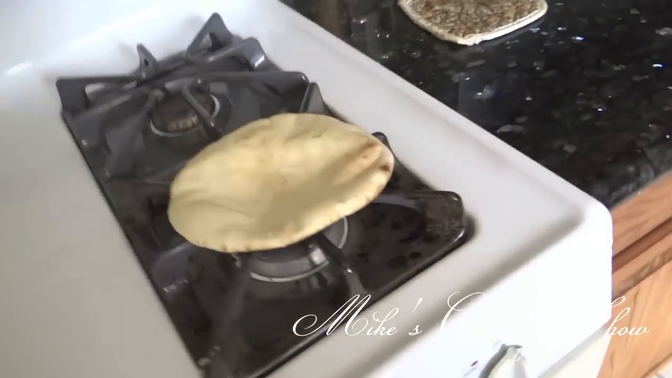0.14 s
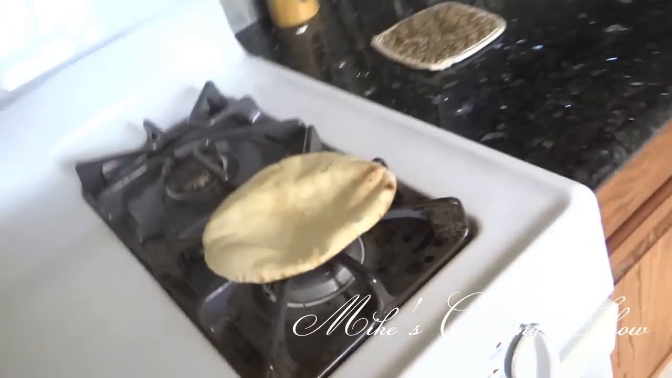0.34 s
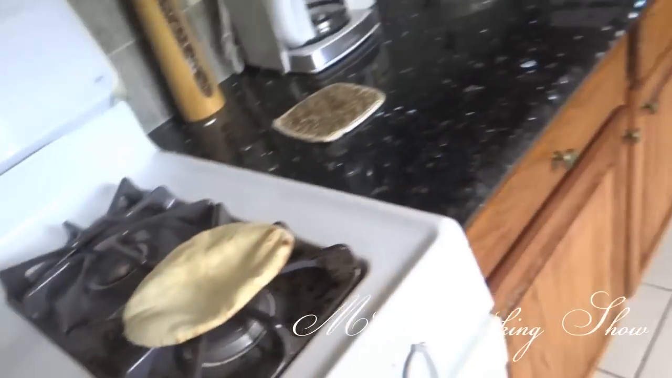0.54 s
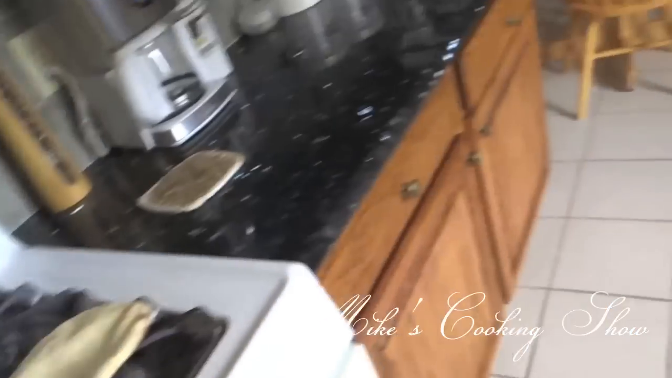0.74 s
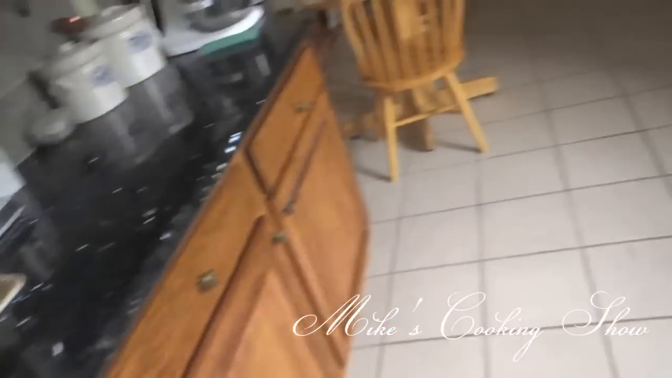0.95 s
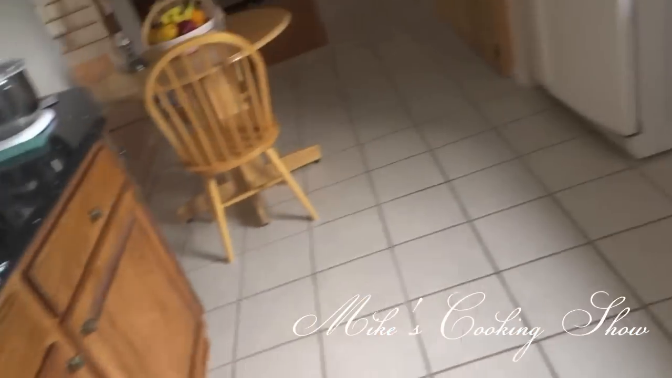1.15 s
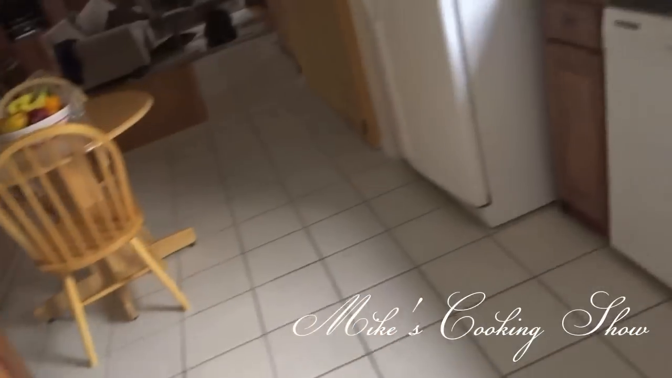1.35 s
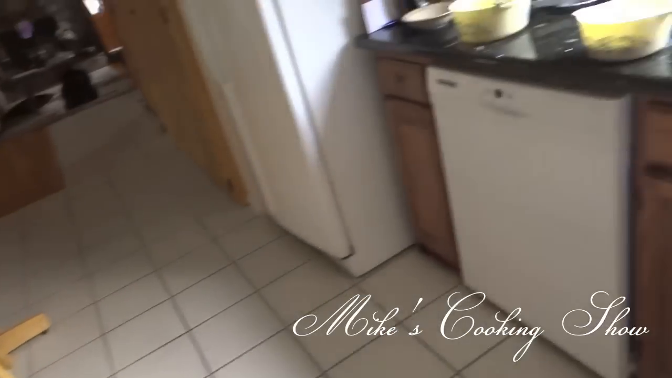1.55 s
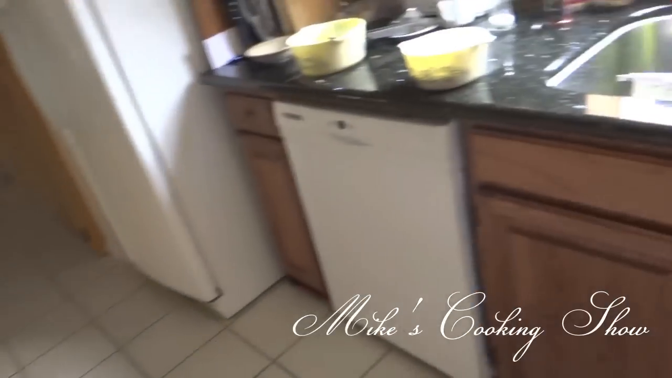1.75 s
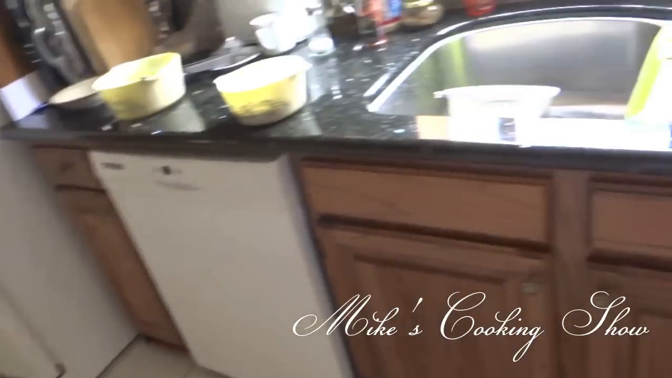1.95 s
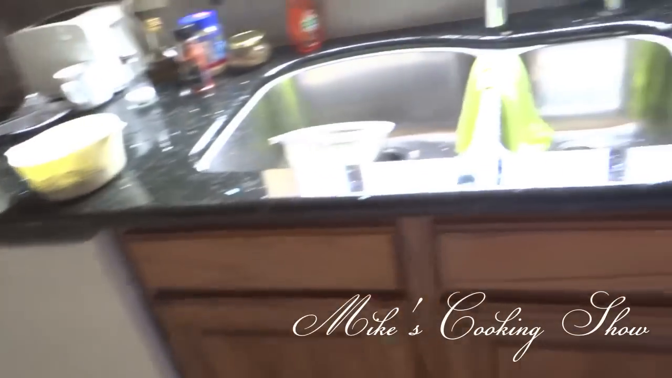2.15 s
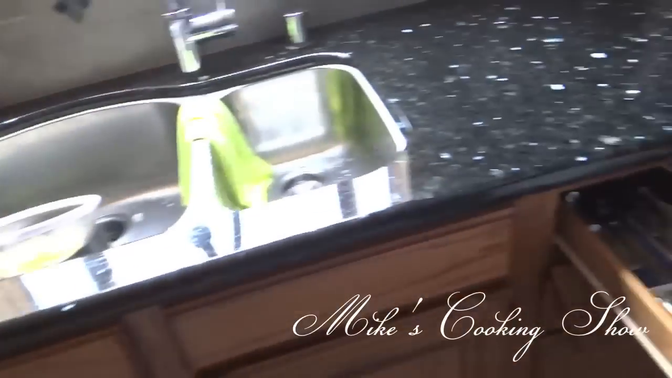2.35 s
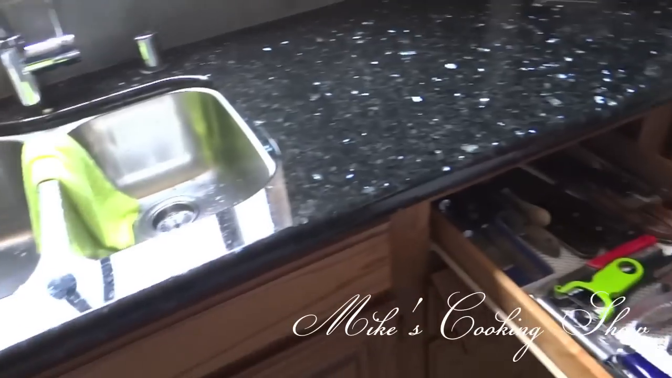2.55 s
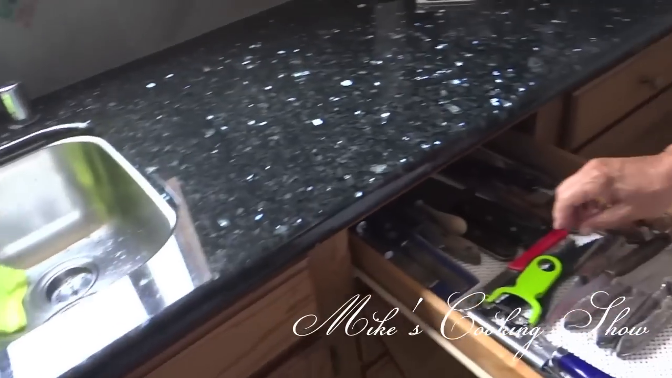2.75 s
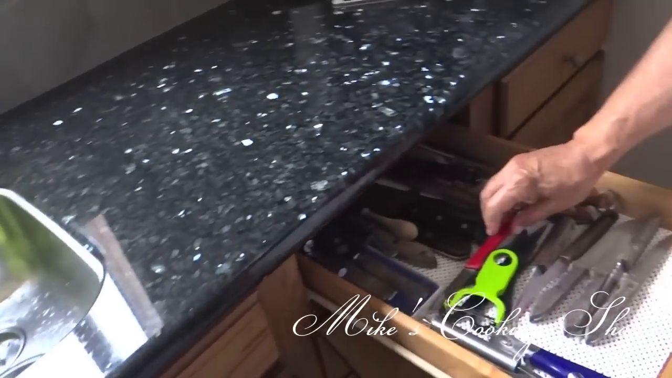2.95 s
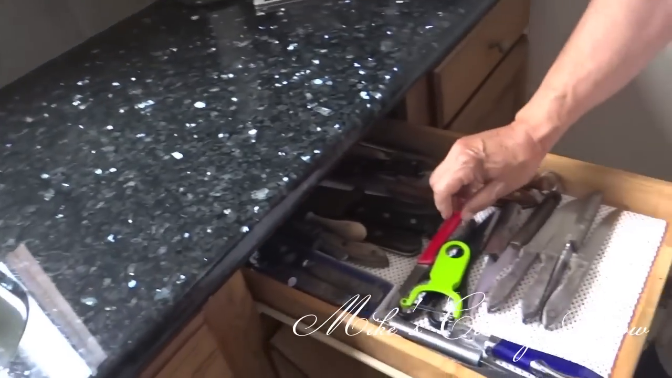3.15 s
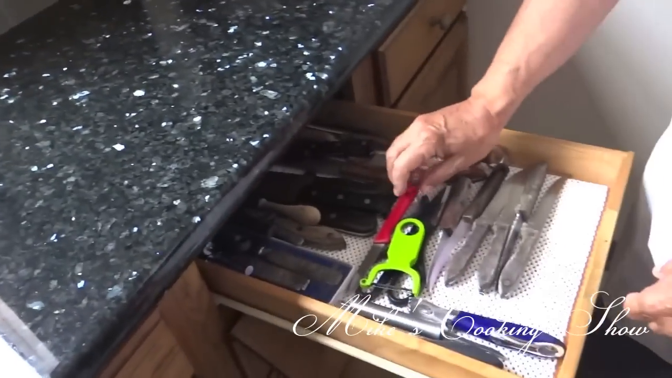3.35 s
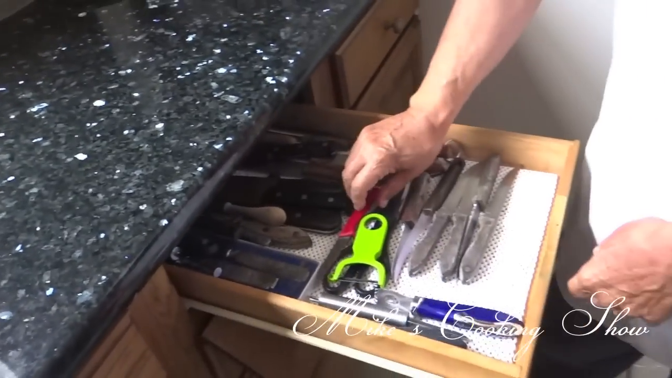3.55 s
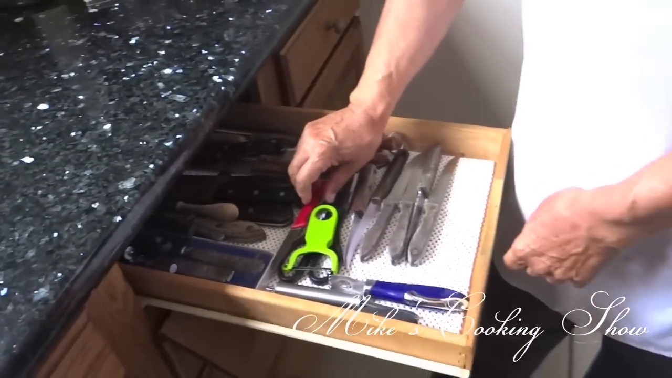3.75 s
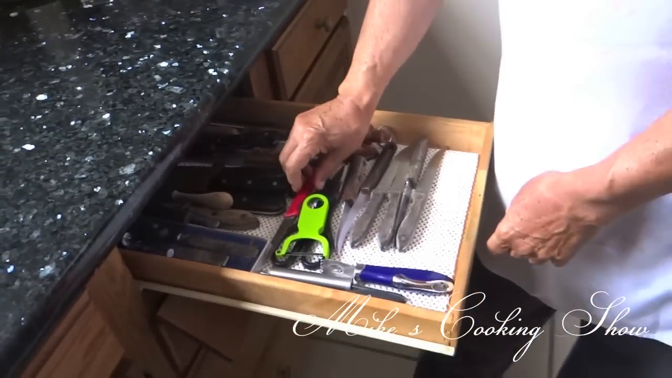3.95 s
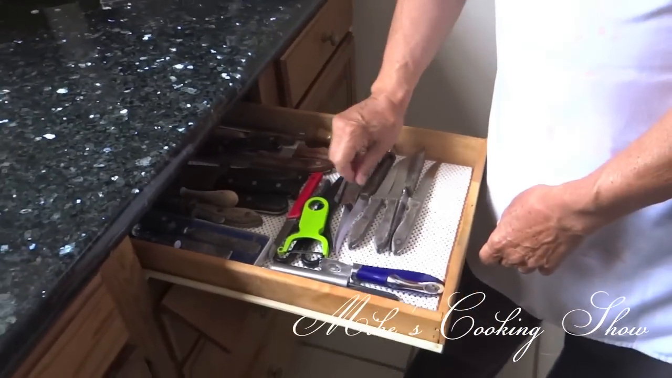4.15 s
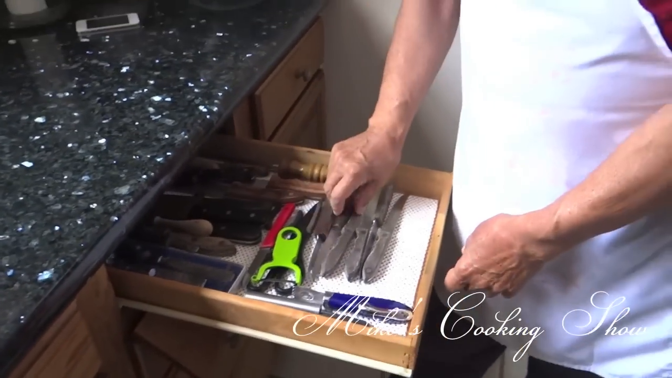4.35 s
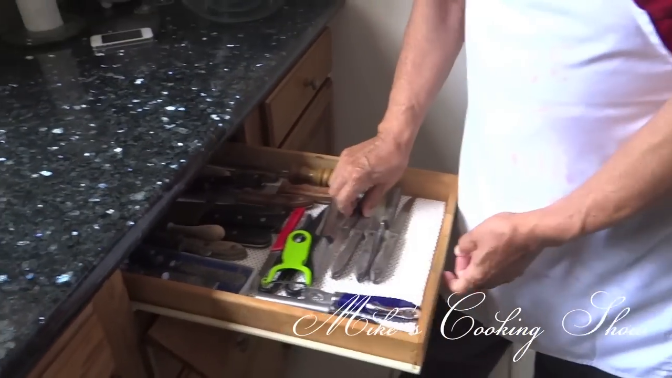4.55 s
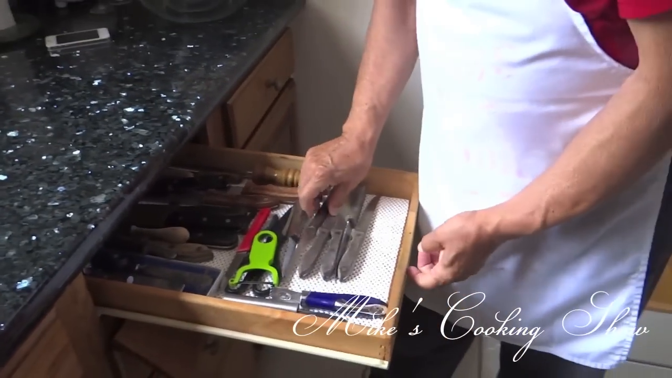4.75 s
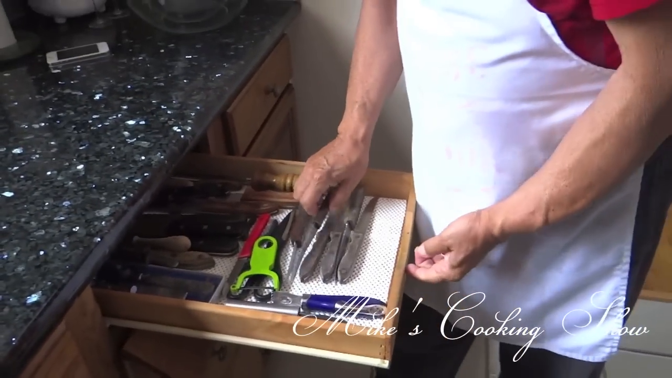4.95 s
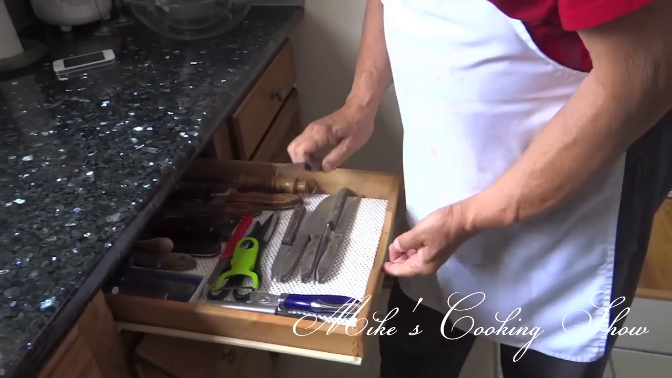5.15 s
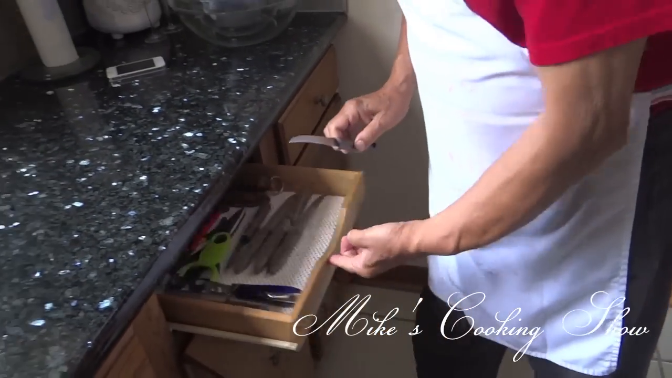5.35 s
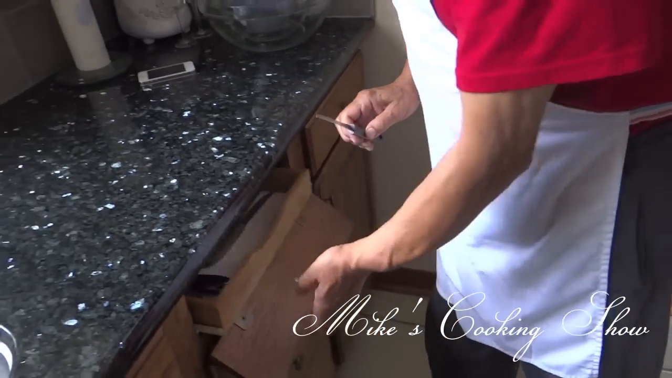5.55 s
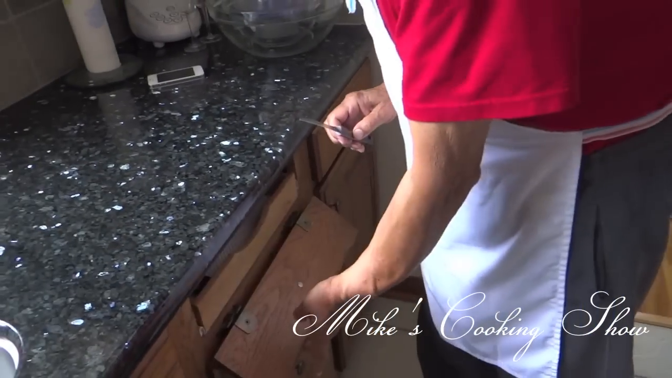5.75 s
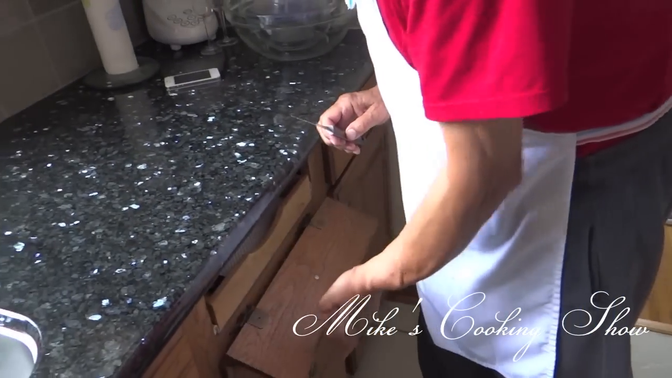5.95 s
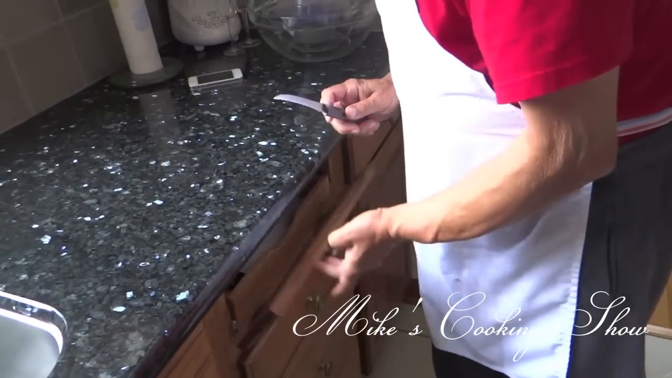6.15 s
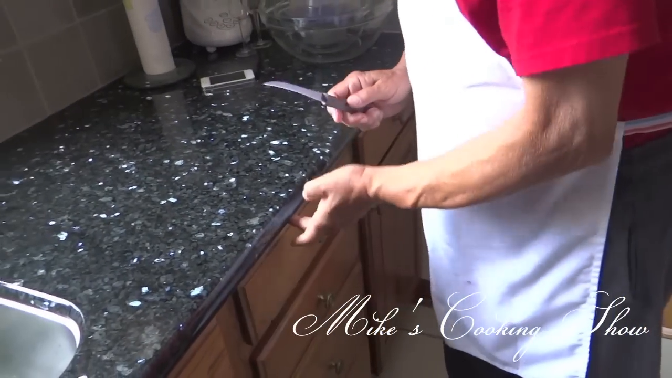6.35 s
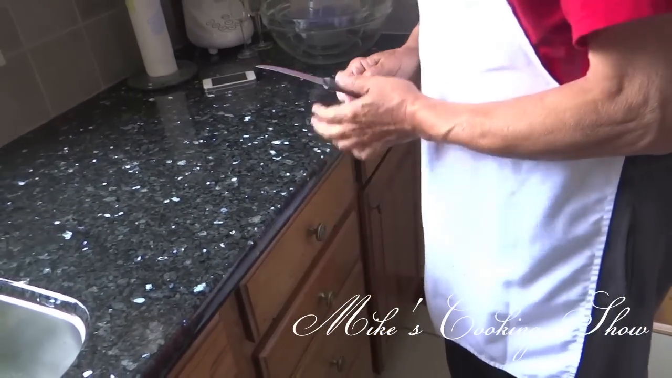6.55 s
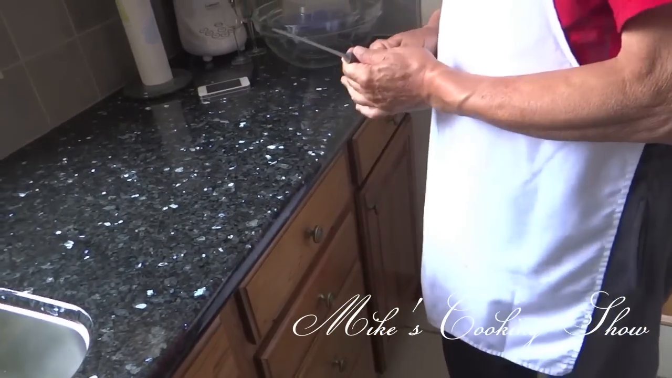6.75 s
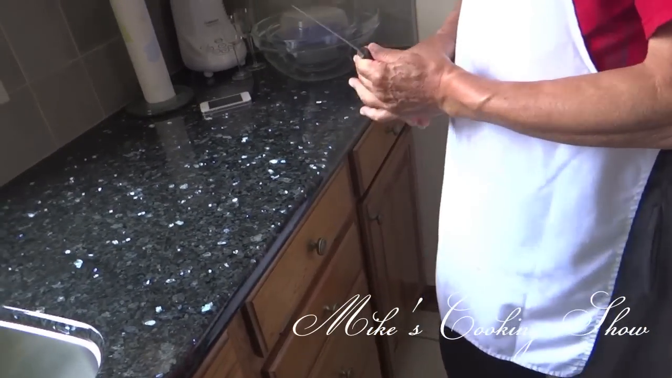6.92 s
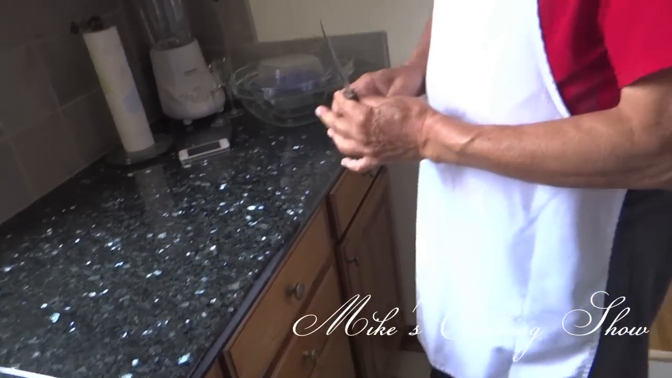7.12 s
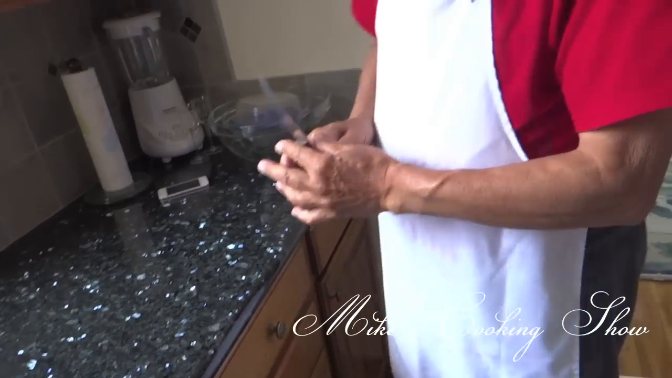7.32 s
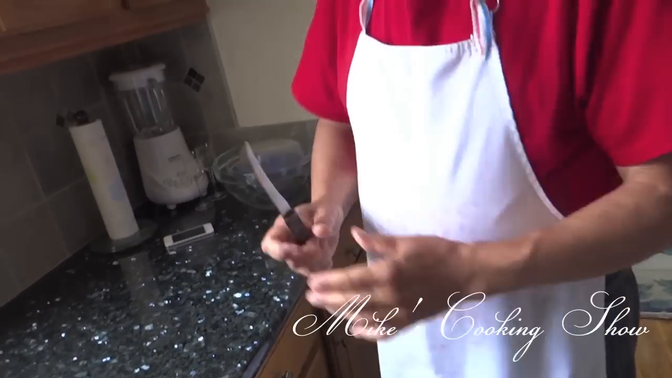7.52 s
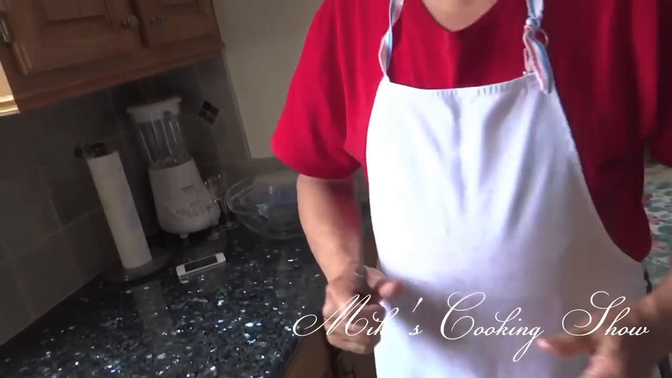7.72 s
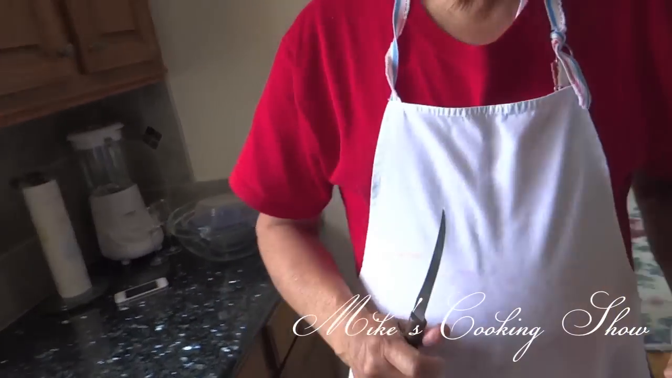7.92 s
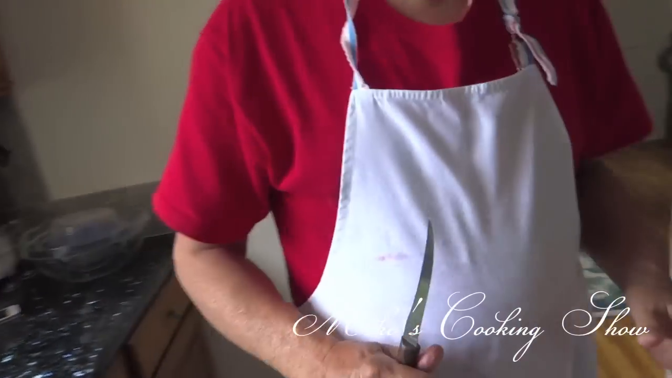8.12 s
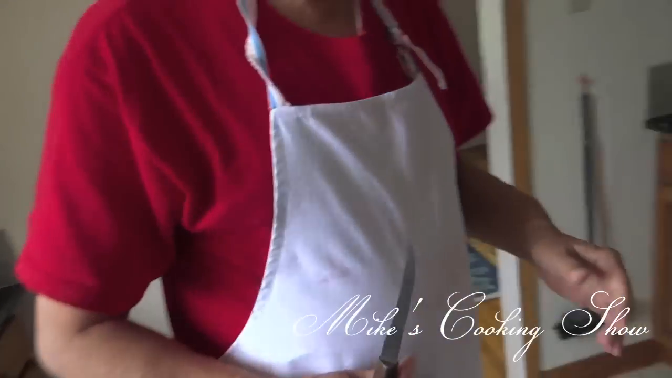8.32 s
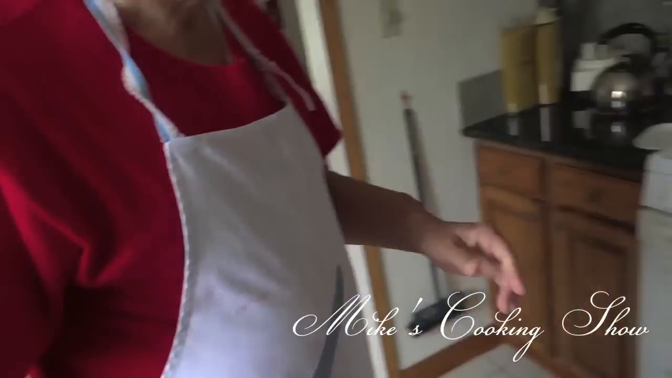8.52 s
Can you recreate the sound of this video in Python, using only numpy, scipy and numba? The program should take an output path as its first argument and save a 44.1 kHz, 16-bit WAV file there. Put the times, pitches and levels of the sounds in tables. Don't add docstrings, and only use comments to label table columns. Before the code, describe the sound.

A small, hard-walled kitchen with a faint fridge hum and airy room tone, heard through a hand-held microphone. From 0 to 1.3 s soles scuff softly on tile, strongest near 0.9 and 1.3, with a tiny chirp. At 1.4 a cabinet front knocks loudly and echoes. From 1.8 to 2.3 a wooden drawer rumbles open on rollers, cutlery skidding to a hard stop at 2.2. A quieter search follows: plasticky clicks at 3.65, a bright blade clatter bouncing at 4.0 to 4.1, dry blade ticks at 4.5, thin steel scrapes around 4.8. From 5.1 the drawer rolls back, with a sharp metallic crash at 5.3, and slams at 5.65. Loose cutlery jingles and rattles until 6.1; a shorter, brighter wooden bang lands at 6.3. Dry handle clicks come near 7.0, then faint cloth rustling, and a final scuff and metallic tick at 8.55.

```python
import sys
import numpy as np
from scipy import signal
from scipy.fft import rfft, irfft, next_fast_len
from scipy.io import wavfile
from scipy.ndimage import uniform_filter1d, minimum_filter1d
from numba import njit

SR = 44100
rng = np.random.default_rng(int(sys.argv[2]) if len(sys.argv) > 2 else 0)


def linear_from_db(decibels):
    return 10 ** (np.asarray(decibels, float) / 20)


def store_pcm(level_fs):
    pcm = np.round(np.clip(level_fs, -1, 1) * 32767).astype(np.int16)
    wavfile.write(sys.argv[1], SR, np.atleast_2d(pcm).T)


N = 378378
TIME = np.arange(N) / SR

# start in seconds, strength in dB, chatter decay in seconds,
# build-up in seconds, share of panel ring in dB.
BLOWS = [
    (1.392, -8, 0.043, 0.0021, -6),
    (5.651, -9.5, 0.031, 0.0034, -11.5),
    (6.2944, -14.5, 0.045, 0.00039, -5),
]
# time the panel keeps shaking in seconds,
# crack into the room in dB, panel into the room in dB.
BLOW_PLACE = [
    (0.0085, 0.64, 2),
    (0.051, 0.23, -7.5),
    (0.016, 0.64, -1),
]
# frequency in Hz, level in dB, t60 in seconds.
THUD = [(287, 2.5, 0.0099), (398, -8, 0.0043), (590, -9, 0.0053), (920, 2, 0.0034)]


def level(x, db):
    return x * linear_from_db(db) / np.sqrt(np.mean(x ** 2))


def shaped(x, points):
    hz, db = np.transpose(points)
    n = next_fast_len(len(x), real=True)
    f = np.maximum(np.arange(n // 2 + 1) * SR / n, 1)
    gain = linear_from_db(np.interp(np.log(f), np.log(hz), db))
    return irfft(rfft(x, n) * gain, n)[:len(x)]


def band(x, lo_hz, hi_hz):
    return signal.sosfilt(signal.butter(2, [lo_hz, hi_hz], "bandpass", fs=SR, output="sos"), x)


def add(track, s, x):
    i = int(s * SR)
    track[i:i + len(x)] += x[:len(track) - i]


def gate(db):
    return uniform_filter1d(linear_from_db(db), size=600)


def swell(s, db, rise, fall):
    out = np.zeros(N)
    i = slice(max(int((s - 3 * rise) * SR), 0), int((s + 3 * fall) * SR))
    away = np.where(TIME[i] < s, (s - TIME[i]) / rise, (TIME[i] - s) / fall)
    out[i] = linear_from_db(db - 20 * away ** 1.37)
    return out


def grains(rate, scatter_db):
    size_db = scatter_db * np.minimum(rng.exponential(size=N), 4)
    return (rng.random(N) < rate / SR) * rng.standard_normal(N) * linear_from_db(size_db)


def ring(modes, length):
    t = np.arange(int(max(length, .2) * SR))[:, None] / SR
    hz, db, t60 = np.transpose(modes)
    start = 2 * np.pi * rng.random(len(hz))
    fade = linear_from_db(db - 60 * t / np.clip(t60, .005, 1))
    return (fade * np.sin(2 * np.pi * hz * t + start)).sum(axis=1)


def burst(points, decay, rise=0.00013, hold=0):
    t = np.arange(8192) / SR
    noise = level(shaped(rng.standard_normal(8192), points), -10.0)
    return noise * np.exp(-np.maximum(t - hold, 0) / decay) * np.minimum(t / rise, 1)


def tick(db, hz, thud_db, treble_db, t60, ring_db=-10, click_s=0.013):
    low_db = -2.0 - .5 * treble_db
    colour = [(600, low_db - 11.0), (1600, low_db), (3000, 0.5 * treble_db),
              (6000, treble_db), (11000, treble_db - 6.5)]
    click = burst(colour, click_s, rise=0.00056)
    hump = [(.6 * hz, -40), (.88 * hz, -10), (hz, 0), (1.12 * hz, -10), (1.6 * hz, -40)]
    body = burst(hump, t60 / np.log(1000), rise=0.0013)
    metal = ring([(hz, ring_db, t60)], .2)[:8192]
    thud = linear_from_db(thud_db + 4.5) * ring(THUD, .2)[:8192]
    return linear_from_db(db) * (0.95 * click + 0.82 * body + metal + thud)


def blows():
    # frequency in Hz, density in dB per Hz.
    colours = [
        [(35, -76), (60, -52), (150, -22), (391, -7.5), (436, -17), (620, -3), (1020, 0.5), (1610, -8.5),
         (7430, -11), (11000, -27.5), (14300, -85), (22000, -120)],
        [(24, -73), (40, -24), (256, -16.5), (350, -8.5), (483, -14), (560, -10), (700, -17.5), (1390, -20),
         (8300, -25.5), (11000, -31), (14300, -81), (22000, -120)],
        [(24, -70), (40, -75), (198, -20), (275, 3), (506, 7.5), (1150, -0.5), (1390, 5.5), (1800, -2.5),
         (4500, -5), (11000, -15), (14300, -65), (22000, -120)],
    ]
    out = np.zeros(N)
    for (s, db, chatter, rise, _), colour in zip(BLOWS, colours):
        add(out, s, linear_from_db(db) * burst(colour, chatter, rise))
    return out


def panels():
    # frequency in Hz, level in dB, t60 in seconds.
    panel_modes = [
        [(806, -9, 0.022), (1016, 6, 0.09), (960, 8, 0.028), (1440, -11, 0.036), (2430, -7, 0.045),
         (3160, 1, 0.018), (4900, -26, 0.052), (6470, 11.5, 0.011), (7280, 5, 0.02)],
        [(260, 10.5, 0.042), (356, -4, 0.072), (479, 1, 0.028), (715, 14.5, 0.034), (1030, 16.5, 0.0099),
         (810, 1, 0.08), (1400, 11.5, 0.025), (2240, 17, 0.0069), (3220, 11, 0.0087), (6040, 17, 0.0043),
         (8400, 9.5, 0.017)],
        [(204, 2, 0.093), (506, 0, 0.046), (806, 10, 0.02), (1485, 14.5, 0.012), (2250, 0.5, 0.046),
         (2400, 2, 0.084), (2950, 5.5, 0.015), (3920, 7, 0.04), (4540, 0, .06)],
    ]
    out = np.zeros(N)
    for (s, db, chatter, rise, ring_db), modes, (hold, *_) in zip(BLOWS, panel_modes, BLOW_PLACE):
        push = burst([(50, 0), (11000, 0)], chatter, 2 * rise, hold)
        damped = [(hz, g, min(t60, .009 + 55 / hz)) for hz, g, t60 in modes]
        panel = signal.fftconvolve(push, ring(damped, .2))[:8192]
        add(out, s, linear_from_db(db + ring_db) * panel * push.std() / panel.std())
    return out


def carcass():
    # start in seconds, frequency in Hz, level in dB, held in seconds, fade in seconds.
    tones = [
        (5.657, 479, -14, .055, .018),
        (5.657, 356, -21, .05, .02),
        (5.655, 705, -22, .03, .02),
        (1.393, 1012, -17, .02, .025),
        (1.445, 1005, -18, .025, .05),
    ]
    out = np.zeros(N)
    t = np.arange(int(.3 * SR)) / SR
    for s, hz, db, hold, fade in tones:
        shape = np.minimum(t / .006, 1) * np.exp(-np.maximum(t - hold, 0) / fade)
        add(out, s, ring([(hz, db, 1)], .3) * shape)
    return out


def drawer():
    # time in seconds, level in dB.
    rolls = [
        [(1.72, -46), (1.78, -45.5), (1.826, -33), (1.95, -33), (2.06, -30), (2.11, -32.5), (2.168, -32.5),
         (2.204, -34), (2.32, -43)],
        [(5.0, -60.5), (5.118, -44), (5.2, -36), (5.276, -29), (5.315, -36), (5.334, -25.5), (5.42, -26.5),
         (5.45, -32), (5.64, -36.5)],
    ]
    # frequency in Hz, width in Hz, level in dB.
    resonances = [(350, 34, 12), (652, 42, 12), (813, 23, -1.5), (1420, 210, 13), (2064, 320, 13)]
    # frequency in Hz, density in dB per Hz.
    grit_colour = [(710, -74), (1200, 2), (1300, 7.5), (2150, 10.5), (3700, 5), (4500, -0.5), (8500, -3),
                   (11000, -18), (14300, -61), (22000, -120)]
    # peak in seconds, level in dB, rise and fall in seconds.
    slides = [
        (2.078, -26, .004, .08),
        (2.106, -21.5, 0.0073, 0.18),
        (2.188, -11, 0.0052, 0.04),
        (2.258, -21, 0.012, 0.037),
        (5.135, -34.5, 0.019, 0.58),
        (5.324, -6, 0.014, 0.02),
        (5.62, -42, 0.067, 0.08),
    ]
    # peak in seconds, level in dB, rise and fall in seconds.
    nudge = (3.565, -47, .006, .1)
    curves = [np.interp(TIME, *np.transpose(rows), left=-120, right=-120) for rows in rolls]
    db = np.max(curves, axis=0)
    skid = sum(swell(*row) for row in slides)
    shake = grains(1500, 2.2)
    box = sum(linear_from_db(g) * band(shake, hz - w / 2, hz + w / 2) / np.sqrt(w) for hz, w, g in resonances)
    box = level(box, -8.5) + level(band(shake, 200, 950), -4)
    grit = level(shaped(grains(5000, 0.25), grit_colour), -1.1)
    slide = level(band(grains(4000, 2.5), 3300, 8300), -14)
    creep_db, skid_grit_db = -38, -18.5
    grit_db = db - 9 + 0.028 * (db + 32)
    out = box * gate(db) + slide * (skid + gate(db + creep_db))
    out += grit * (gate(grit_db) + linear_from_db(skid_grit_db) * skid)
    push = band(rng.standard_normal(N), 307 - 60, 307 + 70)
    out += level(push, 0) * swell(*nudge)
    pan_db = -3 * np.exp(-((TIME - 2.22) / 0.49) ** 4)
    return out * linear_from_db(np.array([pan_db, -pan_db]) / 2)


def utensils():
    # start in seconds, peak in dB, ring in Hz, treble in dB.
    wood = [(0.7527, -27, 1440, -15), (2.192, -15, 2000, -27), (2.21, -11.5, 810, 2),
            (2.2614, -10, 1013, 26), (3.955, -46, 1610, 1), (5.207, -37, 1960, -18),
            (5.2275, -13.5, 1860, -8), (5.87, -23.5, 1420, -23), (5.92, -26, 1590, -26),
            (5.993, -21.5, 1520, -11), (5.997, -31, 2200, -23), (6.045, -29, 1670, -28),
            (6.897, -31.5, 535, -13), (8.3795, -41, 1300, -20)]
    handles = [(0.176, -65, 3180, -27), (2.0775, -18.5, 2960, -16), (2.1019, -20.5, 2890, 6),
               (2.1845, -18.5, 3920, -5), (2.186, -24, 2140, -10), (2.2, -14.5, 1510, -3),
               (2.2522, -25, 2800, -15), (3.525, -38.5, 5900, 9)]
    peeler = [(3.6524, -21, 2450, 11), (3.6604, -22, 8000, -4), (3.6715, -17, 2620, -7),
              (3.68, -24, 2370, -7), (3.6932, -26, 2680, -3), (3.7033, -31, 2560, -8)]
    steel = [(4.723, -42, 4960, -1), (4.782, -32, 6000, 1), (5.142, -19, 4600, 18), (5.282, -19, 7300, -11),
             (5.2975, -16, 7500, -6), (5.309, -12, 8400, 3), (5.323, -4.5, 9100, -2),
             (5.338, -8.5, 6150, -7), (5.134, -17, 5600, 14), (5.208, -18.5, 5960, -7),
             (5.228, -22, 6940, -13), (5.3105, -7, 4270, 2), (5.31, -8, 2260, 6), (5.3205, -6.5, 6060, -16),
             (8.5629, -18.5, 4450, 6)]
    kinds = ((wood, -16, 0.033, .009), (handles, -9.5, 0.1, .009),
             (peeler, -18, .028, .005), (steel, -20.5, 0.015, .009))
    out = np.zeros(N)
    for rows, thud_db, t60, click_s in kinds:
        for s, db, hz, treble_db in rows:
            add(out, s, tick(db, hz, thud_db, treble_db, t60, click_s=click_s))
    return out


def fingers():
    # start in
    # seconds, peak in dB, ring in Hz, treble in dB, ring t60 in seconds.
    near = [(6.977, -28, 3350, -29, 0.024), (6.2428, -36, 1230, -3, 0.022),
            (6.2892, -12.5, 2900, -4, 0.011), (6.2895, -12, 910, -22, 0.0097),
            (6.978, -20.5, 2590, -9.5, 0.034), (6.9988, -33, 3300, 3, 0.02), (6.9985, -38, 2570, -15, .025),
            (7.0743, -38, 1500, -25, .03), (6.969, -41, 2500, -15, 0.032), (6.978, -39, 1450, -18, 0.033),
            (7, -43, 1400, -12, .025), (7.022, -39, 2900, 0, 0.019)]
    latch = (6.2718, -36, 1800, -8, .03)
    # frequency in Hz, level in dB, t60 in seconds.
    blade = [(2390, -17, .14), (2560, -15, .12), (2960, -9, .06), (3740, -5, .075), (4753, -7, .055),
             (5173, -4, .05), (5916, -3, .045), (6428, -3, .05), (6804, -2, .05), (7402, -7, .07),
             (7919, -3, .08), (8570, -7, .06), (9120, 1, .08), (9500, -4, .05), (10300, -3, .03)]
    # start in seconds, peak in dB, wood thud in dB, favoured partial in Hz.
    hits = [
        (4.0045, -16.5, -20, 4753),
        (4.0868, -27.5, -22, 3730),
        (4.135, -40, -28, 3730),
        (4.0125, -22, -26, 2480),
    ]
    out = np.zeros(N)
    for s, db, hz, treble_db, t60 in near + [latch]:
        add(out, s, tick(db, hz, -34, treble_db, t60, ring_db=-5, click_s=.0035))
    clatter_colour = [(700, -5.5), (1500, -6.5), (2500, 2.0), (5300, 0.0), (9000, 2.5), (11000, -17)]
    for s, db, thud_db, favoured_hz in hits:
        pairs = []
        for hz, g, t60 in blade:
            favour_db = 8 * (abs(hz / favoured_hz - 1) < .05)
            for k, last in ((1, 2.1), (1.012, 1)):
                pairs.append((hz * k, g + favour_db + 1.5 * rng.standard_normal(), last * t60))
        clatter = burst(clatter_colour, 0.041, rise=0.0011)
        thud = linear_from_db(db + thud_db - 7.0) * ring(THUD, .2)[:8192]
        add(out, s, linear_from_db(db - 6.5) * clatter + thud)
        add(out, s, linear_from_db(db - 15.5) * ring(pairs, .4))
    return out


def blades():
    # start in seconds, peak in dB.
    rocks = [(4.5126, -27), (4.5204, -30), (4.5351, -28), (4.5424, -32), (4.5564, -32), (4.5604, -33),
             (4.5654, -34), (4.5764, -36), (4.6234, -32), (4.6304, -38)]
    # frequency in Hz, level in dB, t60 in seconds.
    stack = [(2250, -17, .08), (2950, -18, .04), (4900, -5, .015), (5500, -7, .015), (6900, -4, .015),
             (7700, 0, .018), (10100, -1, .018)]
    # peak in seconds, level in dB, rise and fall in seconds,
    # frequency in Hz.
    scrapes = [(4.295, -51, 0.018, 0.02, 7200), (4.3, -53.5, 0.027, 0.035, 5380),
               (4.305, -57, 0.037, 0.039, 3250), (4.33, -55.5, 0.05, 0.036, 3950),
               (4.345, -57, .015, 0.014, 2250), (4.485, -57, .02, 0.025, 7140),
               (4.788, -51, .01, 0.019, 3860), (4.815, -51.5, 0.016, 0.025, 5100),
               (4.82, -55, .02, 0.026, 7300), (4.825, -56, 0.019, 0.034, 10250),
               (4.83, -47, .01, 0.028, 3450), (4.885, -56, 0.011, 0.011, 3430),
               (4.82, -57, 0.047, 0.018, 1140), (3.978, -52, .004, .008, 7600),
               (6.22, -57, 0.031, 0.057, 8460), (6.274, -50, .003, .03, 2980),
               (6.28, -48, 0.011, .02, 4150), (6.282, -49, 0.014, .02, 1870),
               (6.204, -55, .005, 0.0081, 1530), (6.904, -51, .008, .05, 1710),
               (6.915, -50, .015, 0.064, 1060), (6.91, -69, 0.01, .03, 4300),
               (7.076, -54, .003, 0.026, 1150), (7.078, -55, .004, 0.017, 1600),
               (7.095, -61, .005, 0.014, 1500), (7.13, -59, .015, 0.026, 1730),
               (7.17, -64, .015, .02, 3920), (7.27, -58, 0.017, 0.024, 1900), (7.32, -60, 0.044, .04, 3300),
               (7.36, -69, .1, 0.066, 3950), (7.4, -64, .06, .04, 3230), (7.48, -64, 0.064, 0.041, 2430),
               (7.56, -64, .03, .02, 4160), (5.33, -24, .012, 0.061, 6070),
               (5.315, -25, 0.0071, 0.031, 4430), (5.229, -43, 0.0033, 0.045, 1850),
               (3.676, -42, .008, 0.084, 2580), (5.88, -40, 0.022, 0.033, 1460),
               (5.93, -51, .02, 0.037, 1650), (6.0, -43, .012, .04, 1460),
               (6.899, -45.5, 0.0014, 0.022, 550)]
    out = np.zeros(N)
    for s, db in rocks:
        modes = [(hz * (1 + .02 * rng.standard_normal()), g + 3 * rng.standard_normal(), t60)
                 for hz, g, t60 in stack]
        click = burst([(1500, -28), (4000, -7), (7500, -2), (11000, -6)], 0.0063, rise=.0002)
        add(out, s, linear_from_db(db) * (click + linear_from_db(-10) * ring(modes, .2)[:8192]))
    rub = grains(4000, 1.8)
    half_hz = 210
    for s, db, rise, fall, hz in scrapes:
        i = slice(int((s - .3) * SR), int((s + .3) * SR))
        out[i] += level(band(rub[i], hz - half_hz, hz + half_hz), 0) * swell(s, db, rise, fall)[i]
    return out


def jingle():
    # time in seconds, level in dB.
    rattle_curve = [(5.678, -12), (5.75, -60), (5.85, -45), (5.95, -32.5), (6.029, -32.5), (6.1, -74)]
    # frequency in Hz, level in dB, t60 in seconds.
    cutlery = [(1400, 10, 0.022), (1650, 12, 0.022), (2240, 5, 0.03), (4060, -9, 0.04), (4624, -12, 0.04),
               (5320, -8, 0.03)]
    # start in seconds, frequency in Hz, level in dB, t60 in seconds.
    late_rings = [(5.735, 4059, -20, .4), (5.81, 4059, -26, .16), (5.755, 4624, -27, .2),
                  (5.82, 4624, -31, .2), (5.895, 4624, -36, .3), (5.99, 4624, -36, .1),
                  (5.868, 4910, -30, .28), (5.988, 4910, -35, .09), (5.875, 5701, -36, .22),
                  (5.875, 5437, -41, .2), (5.86, 2250, -35, .3), (5.875, 4059, -35, .2),
                  (5.76, 6433, -34, .2), (5.87, 6804, -39, .12)]
    s, db = np.transpose(rattle_curve)
    touches = grains(900, 1.4)
    rings = signal.fftconvolve(touches, ring(cutlery, .3))[:N]
    rattle = level(rings, 0) + level(band(touches, 860, 6600), -5)
    out = rattle * linear_from_db(np.interp(TIME, s, db, left=-120, right=-120))
    soft_ends = signal.windows.tukey(int(.3 * SR), .06)
    for s, hz, db, t60 in late_rings:
        pair = [(hz, db, t60), (1.006 * hz, db - 11, t60)]
        add(out, s, ring(pair, .3) * soft_ends)
    return out


def scuffs():
    # peak in seconds, level in dB, rise and fall in seconds, treble in dB.
    steps = [(0.0, -52, .05, 0.025, 18), (0.05, -44.5, 0.15, 0.26, -0.5), (0.61, -41.5, 0.08, 0.15, -0.5),
             (0.76, -56.5, 0.0055, 0.055, -25.5), (0.91, -31.5, 0.086, 0.14, -2.5),
             (1.234, -45.5, 0.0045, 0.11, 7.5), (1.29, -32, 0.051, 0.058, 3), (2.5, -50.5, 0.83, 0.15, -4),
             (2.74, -39, 0.073, 0.086, 3.5), (8.51, -39, 0.094, 0.011, 13.5), (8.58, -45, 0.011, .1, 18)]
    rustles = [(3.05, -53, .2, 0.13, -4), (3.11, -53.5, 0.018, 0.059, 1), (3.53, -51.5, 0.2, 0.22, -1),
               (3.99, -54, 0.068, 0.054, 4), (4.32, -52.5, 0.16, 0.12, 3.5), (4.52, -54.5, 0.12, 0.4, 3),
               (4.83, -51, 0.062, 0.035, 4), (6.235, -48.5, 0.062, 0.19, -1), (6.905, -54, .008, 0.14, -13),
               (6.98, -49.5, 0.02, 0.022, -26), (7.2, -55.5, 0.23, 0.83, -2),
               (7.57, -51, 0.19, 0.027, -2.5), (7.78, -56.5, 0.053, 0.22, 5), (7.95, -53, 0.2, 0.18, 0),
               (8.25, -52, 0.25, 0.05, 6), (8.37, -51.5, 0.048, 0.99, -18)]
    # level in dB, frequency in Hz, half length in seconds.
    squeak = (-43, 815, 0.035)
    mid, hiss, low = np.zeros((3, N))
    for strokes, rub_db in ((steps, -1), (rustles, -8.5)):
        for s, db, rise, fall, treble_db in strokes:
            stroke = swell(s, db, rise, fall)
            mid += stroke
            hiss += linear_from_db(treble_db) * stroke
            low += linear_from_db(rub_db - 0.82 * treble_db) * stroke
    rub = grains(9000, 0.28)
    out = level(band(rub, 1990, 5650), 0.18) * mid
    out += level(band(rub, 4340, 9160), -0.94) * hiss
    out += level(band(rub, 430, 3380), -3.15) * low
    squeak_db, hz, half = squeak
    wobble = level(band(rng.standard_normal(N), 10, 60), 1)
    chirp = level(np.sin(2 * np.pi * hz * TIME + wobble), squeak_db)
    return out + chirp * np.exp(-((TIME - .945) / half) ** 2)


def jolts():
    starts = [2.04, 3.62, 5.63, 6.27]
    # level in dB, frequency in Hz, t60 in seconds.
    thumps = [(-46, 31, 0.36), (-52, 52, 0.22), (-34, 73, 0.42), (-31.5, 86.6, 0.29)]
    out = np.zeros(N)
    for s, (db, hz, t60) in zip(starts, thumps):
        thump = ring([(hz, 0, t60), (1.5 * hz, -4, t60)], .2)[:8000]
        add(out, s, linear_from_db(db) * np.hanning(8000) * thump)
    return out


def kitchen(x):
    # frequency in Hz, t60 in seconds.
    reverb = [(100, 0.99), (300, 0.53), (1000, 0.73), (3000, 0.51), (6000, 0.59), (10000, 0.52)]
    # frequency in Hz, side minus mid in dB.
    side_colour = [(100, -20), (400, -23.5), (1000, -9), (4000, -11), (10000, -13)]
    t = np.arange(int(.9 * SR)) / SR
    tail = np.zeros((2, len(t)))
    hz, t60 = np.transpose(reverb)
    for f in 60 * 2. ** np.arange(8):
        fade = linear_from_db(-60 * t / np.interp(np.log(f), np.log(hz), t60))
        tail += band(rng.standard_normal(tail.shape), f / 1.395, f * 1.365) * fade
    tail *= np.clip((t - .002) / 0.00032, 0, 1) / np.sqrt(np.sum(tail[0] ** 2))
    side = shaped(tail[1], side_colour)
    return np.array([signal.fftconvolve(x, tail[0] + sign * side)[:N] for sign in (1, -1)])


def floor():
    # frequency in Hz, density in dB per Hz.
    air = [(15, -22), (25, -25), (117, -9.5), (245, 2.5), (442, 7), (602, 0), (1060, -1), (1330, -2.5),
           (1550, -3.5), (2230, -9.5), (9370, -11), (10600, -14), (11500, -73), (15000, -44), (22000, -120)]
    # frequency in Hz, width in Hz, level in dB.
    fridge = [(58.5, 16, -81), (166, 15, -74), (406.5, 3.4, -65.5), (478, 23, -74)]
    air_db = -58.5
    mid = level(shaped(rng.standard_normal(N), air), air_db)
    side = level(shaped(rng.standard_normal(N), air), air_db - 6)
    for hz, width, db in fridge:
        mid += level(band(rng.standard_normal(N), hz - width / 2, hz + width / 2), db)
    mid += level(np.sin(2 * np.pi * 119.4 * TIME), -74.5)
    return np.array([mid + side, mid - side])


def ports(direct):
    echo = rng.standard_normal(512) * np.exp(-np.arange(512) / (0.0014 * SR))
    side = linear_from_db(-11.5) * signal.fftconvolve(direct.mean(axis=0), echo / np.linalg.norm(echo))[:N]
    side = band(side, 530, 9700)
    return direct + np.array([side, -side])


def scene():
    # direct in dB, into the room in dB.
    place = [
        (8, 2.5),
        (-4, -13),
        (-13.5, -18),
        (-8, -13),
        (0, -8),
    ]
    close = (0, -21)
    panel_place = (13.7, 0.43)
    carcass_place = (0, -20)
    sources = (blows, utensils, jingle, scuffs, drawer, fingers, panels, blades, carcass)
    places = place + [close, panel_place, (0, -11), carcass_place]
    latest = np.searchsorted([row[0] for row in BLOWS[1:]], TIME)
    extra_db = {blows: np.array(BLOW_PLACE)[latest, 1], panels: np.array(BLOW_PLACE)[latest, 2]}
    direct, sent = np.zeros((2, N)), np.zeros(N)
    for source, (direct_db, room_db) in zip(sources, places):
        x = np.atleast_2d(source())
        direct += linear_from_db(direct_db) * x
        sent += linear_from_db(room_db + extra_db.get(source, 0)) * x.mean(axis=0)
    thin = signal.butter(5, 140, "highpass", fs=SR, output="sos")
    return signal.sosfilt(thin, ports(direct) + kitchen(sent)) + floor() + jolts()


@njit
def follow(x, attack, release):
    e, out = 0., np.empty(len(x))
    for i in range(len(x)):
        e += (x[i] - e) * (attack if x[i] > e else release)
        out[i] = e
    return out


def band_limit(x):
    return signal.sosfilt(signal.butter(12, 12320, fs=SR, output="sos"), x)


def record(dry):
    limit_db, ratio, attack_s, release_s = -6, 7, 0.0006, 0.014
    peak = -minimum_filter1d(-np.abs(dry).max(axis=0), size=120)
    loud = follow(peak, 1 / (attack_s * SR), 1 / (release_s * SR))
    held = dry * np.minimum(linear_from_db(limit_db) / (loud + 1e-9), 1) ** (1 - 1 / ratio)
    held = np.tanh(held)
    top_cut = signal.ellip(10, .3, 76, 11000, fs=SR, output="sos")
    return band_limit(signal.sosfilt(top_cut, held))


dry = scene()
out = record(dry)
store_pcm(out)
```